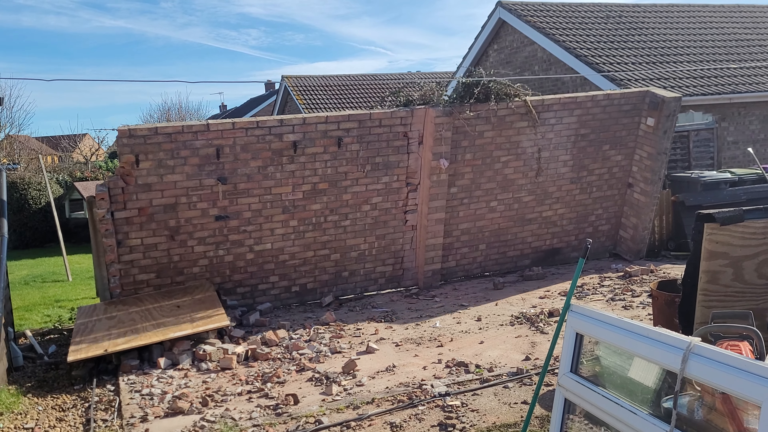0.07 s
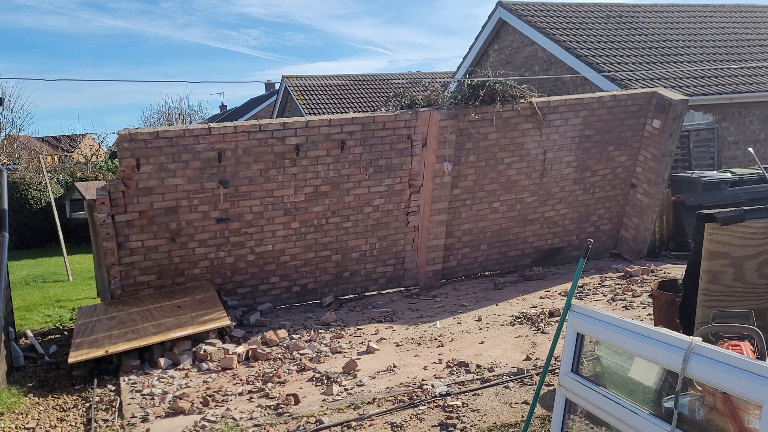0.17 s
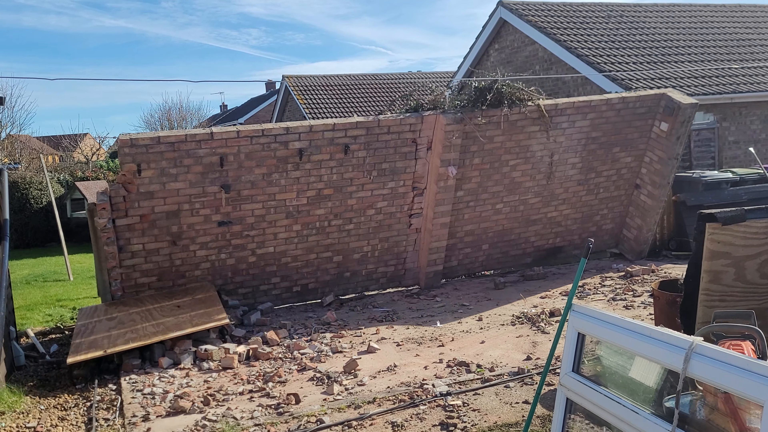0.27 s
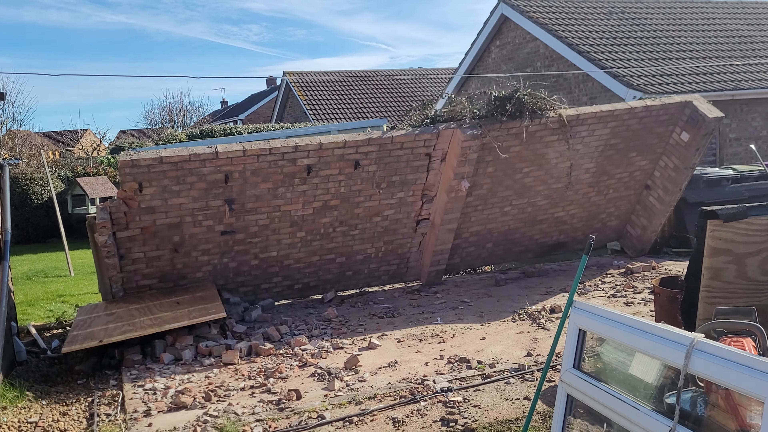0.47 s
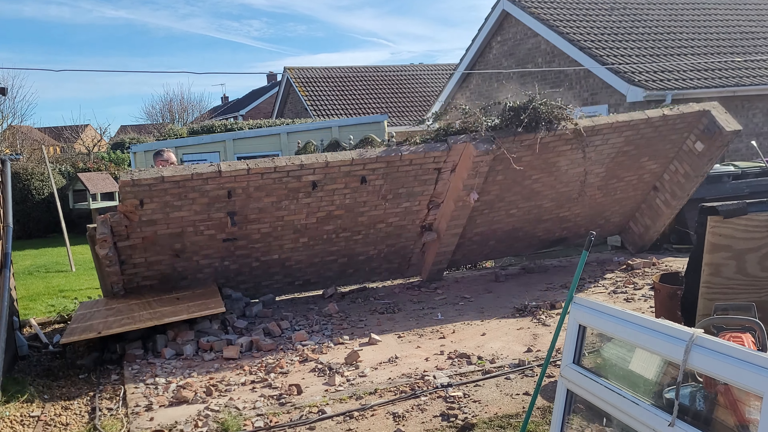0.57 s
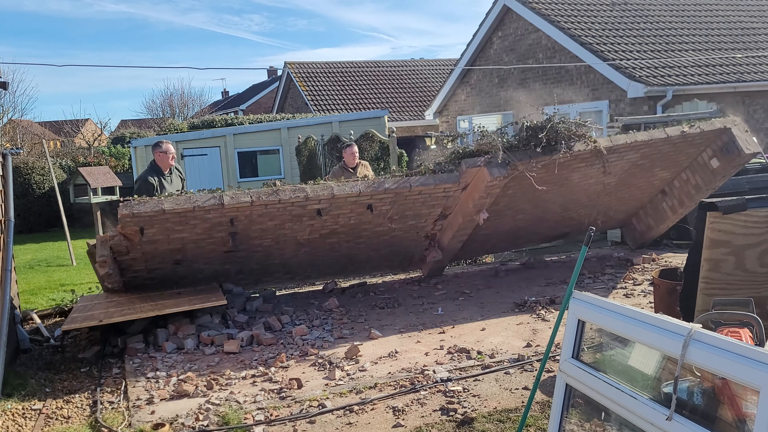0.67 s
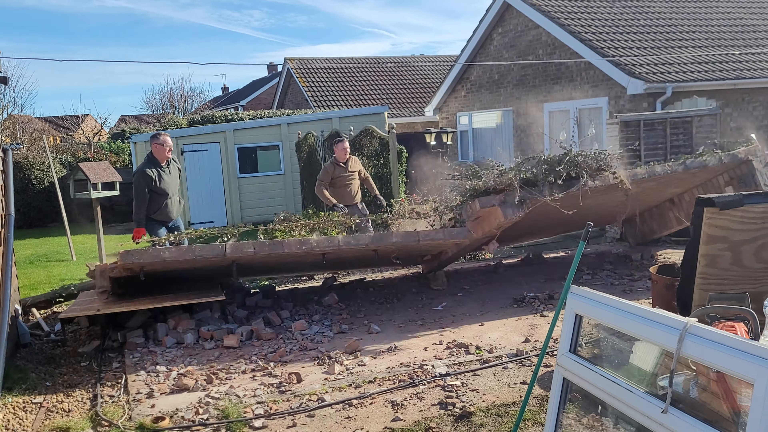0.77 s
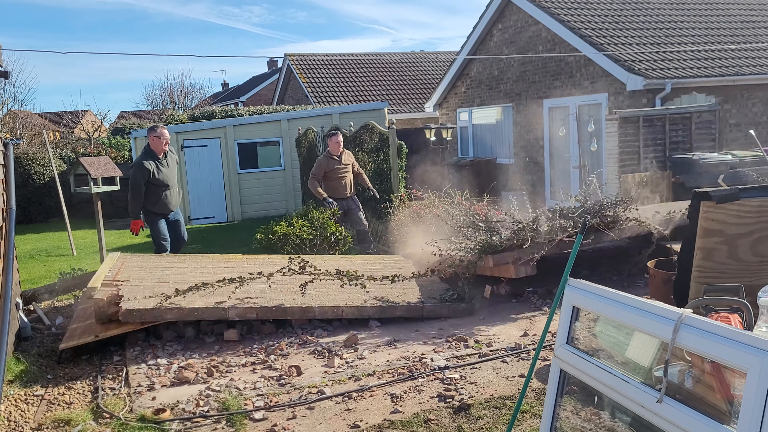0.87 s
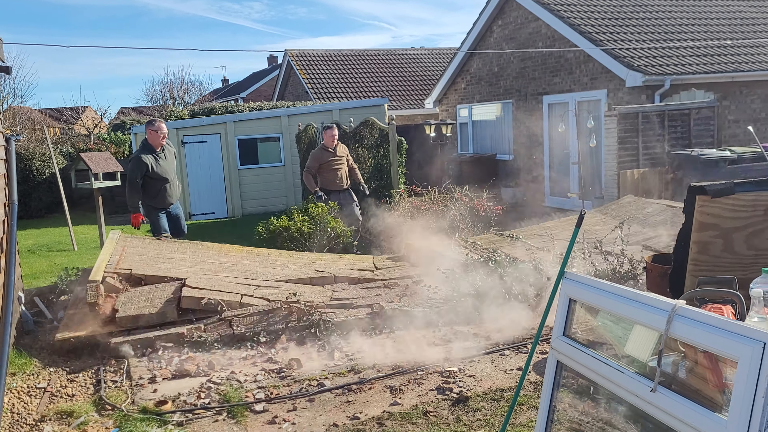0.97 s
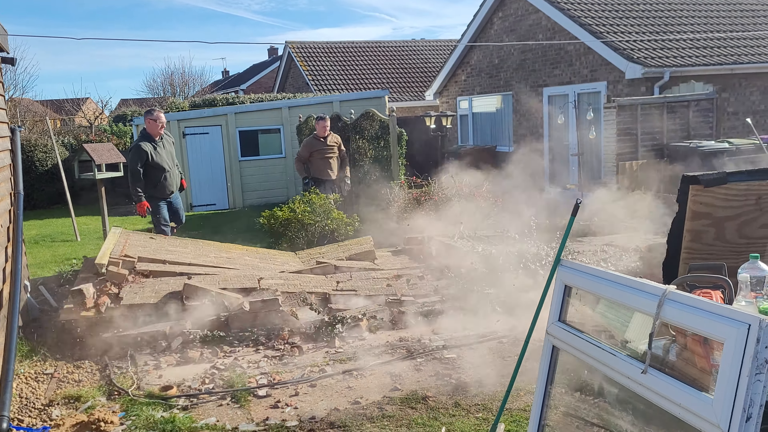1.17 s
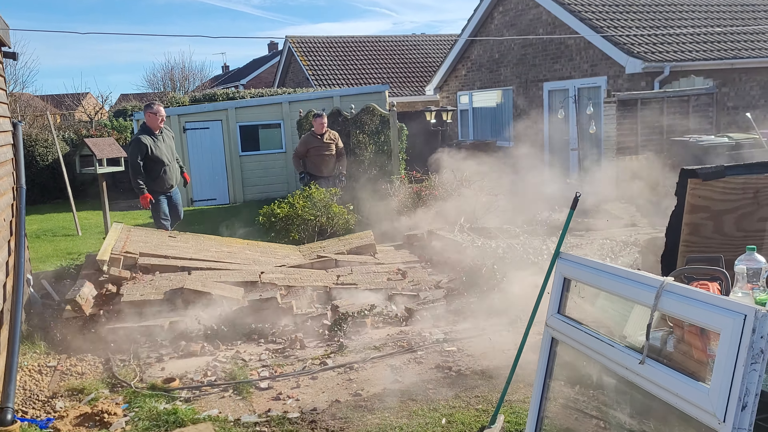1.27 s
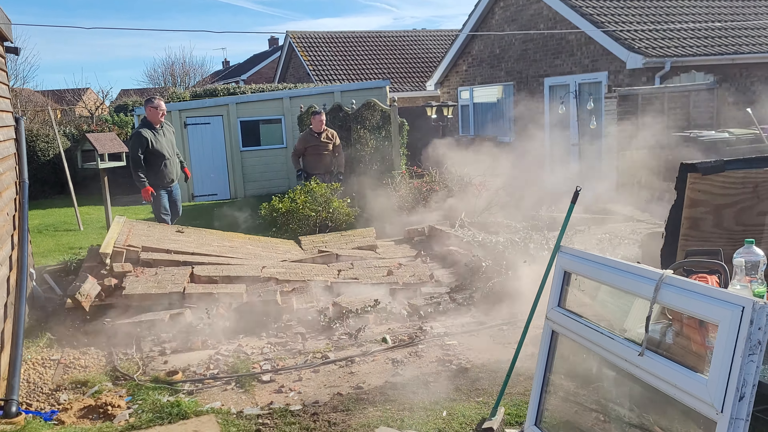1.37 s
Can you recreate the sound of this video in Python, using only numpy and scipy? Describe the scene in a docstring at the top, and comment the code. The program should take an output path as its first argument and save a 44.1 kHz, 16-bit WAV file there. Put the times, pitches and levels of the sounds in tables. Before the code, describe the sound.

Heard from a few metres off outdoors, a brick wall falls over. It knocks, cracks and grinds as it leans, then slams onto the paving with clacking bricks and heavy thuds, leaving a low rumble and trickling grit.

```python
"""Low shudders and dull knocks come first, as a brick wall starts to tip over in a garden a few metres away.
Its mortar cracks and grinds as it leans; then it slaps onto the paving in a burst of breaking brick.
The ground booms, slabs thud down one after another and the rubble settles.
Rubble is made of showers of tiny noise bursts; thuds, clacks and the boom are tones that die away."""
import sys
import numpy as np
from scipy import signal
from scipy.io import wavfile
from scipy.ndimage import uniform_filter1d

SR = 44100
rng = np.random.default_rng(int(sys.argv[2]) if len(sys.argv) > 2 else 0)


def generate_wav(sig):
    """Save sig (samples, or channels by samples) to the path in sys.argv[1] as 16-bit PCM at SR."""
    pcm = np.round(np.clip(np.atleast_2d(sig).T, -1, 1) * 32767).astype(np.int16)
    wavfile.write(sys.argv[1], SR, pcm)


N = 61739
TIME = np.arange(N) / SR

# The deep tone of heavy masonry. Each row: frequency in Hz, relative strength in dB.
MASONRY_SPECTRUM = [(30, -16), (60, 0.5), (130, 5.5), (245, 1), (310, -4.5), (520, -20), (900, -30)]


def tumbling_bricks():
    """Bricks pour onto the paving, loudest as the wall lands."""
    # Each row: time in seconds, level in dB.
    loudness = [(0, -44.5), (.55, -33), (.76, -38), (.85, -36.5), (.89, -17.5), (.94, -10), (.972, -10.5),
                (.995, -23.5), (1.08, -25.5), (1.16, -38.5), (1.4, -45.5)]
    # Each row: frequency in Hz, relative strength in dB.
    spectrum = [(250, -1), (400, -1), (600, -8.5), (920, -6.5), (1400, -20), (2300, -20.5), (4000, -79)]
    return level(loudness) * debris(spectrum, hits_per_s=600, spread_db=0.5, hiss_db=-5, steady_s=0.0132)


def slab_thuds():
    """Each slab lands with a low, quickly fading tone and a dull crunch."""
    # Each row: start in seconds, peak level in dB, pitch in Hz, fade time in seconds.
    landings = [(0.18, -18, 130.4, 0.024), (0.215, -19, 99, 0.065), (0.402, -21, 102.3, 0.042),
                (.461, -16.5, 265.5, 0.018), (0.55, -19.5, 89, 0.029), (0.607, -21, 130, 0.025),
                (0.72, -16.5, 233, 0.0093), (0.812, -9, 191.4, 0.0068), (.815, -19, 730, 0.0057),
                (0.94, -6.5, 250.5, 0.0063), (0.951, -16.5, 61.5, 0.039), (0.974, -6.5, 238, 0.013),
                (0.994, -4, 70, 0.024), (1.014, -10.5, 255, 0.0049), (1.082, -11.5, 249.4, 0.015),
                (1.192, -19.5, 382, 0.0047)]
    rise_s, crunch_db = 0.003, -8
    out = np.zeros((2, N))
    crunch = debris(MASONRY_SPECTRUM, hits_per_s=1800, spread_db=1.5, hiss_db=-8, steady_s=0.026)
    for start, db, hz, fade_s in landings:
        age = np.maximum(TIME - start, 0)
        shape = (1 - np.exp(-age / rise_s)) * np.exp(-age / fade_s)
        thud = np.sin(2 * np.pi * hz * age) + from_db(crunch_db) * crunch
        out += from_db(db) * shape / shape.max() * thud
    return out


def masonry_rumble():
    """Heavy pieces knock together in a muffled rumble with a hollow ring."""
    # Each row: time in seconds, level in dB.
    loudness = [(0, -35), (.11, -30.5), (.155, -48), (.2, -31), (.33, -36.5), (.46, -25.5), (.7, -25),
                (.79, -27), (.87, -19.5), (.97, -15), (1.03, -13), (1.11, -18), (1.17, -28), (1.29, -31.5),
                (1.4, -47)]
    knocking = debris(MASONRY_SPECTRUM, hits_per_s=200, spread_db=3.5, hiss_db=-4, steady_s=0.0189)
    return level(loudness) * muffle(from_db(-2.5) * knocking + hollow_ring(), hz=980)


def hollow_ring():
    """Knocks keep the masonry ringing at one pitch, which glides as the wall breaks."""
    # Each row: time in seconds, pitch in Hz, level within the rumble in dB.
    glide = [(.68, 248, -5.5), (.755, 297, 0.5), (0.826, 238.5, 3.5), (.93, 280, 2), (.99, 241, -2.5),
             (1.12, 281, -3.5), (1.21, 227, -0.5)]
    width_hz, steady_s = 22, 0.0317
    times, hz, db = np.transpose(glide)
    tone = np.exp(2j * np.pi * np.cumsum(np.interp(TIME, times, hz)) / SR)
    knocks = impacts(hits_per_s=400, spread_db=2)[0]
    # Keep only the part of the knocks that lies close to the gliding pitch.
    ring = signal.lfilter([1], [1, -np.exp(-np.pi * width_hz / SR)], knocks / tone)
    power = uniform_filter1d(np.abs(ring) ** 2, int(steady_s * SR) + 1)
    steady_ring = np.sqrt(2) * (ring * tone).real / np.sqrt(np.abs(power) + 1e-3)
    return from_db(np.interp(TIME, times, db)) * steady_ring


def cracks():
    """Brick and mortar break, each time in a short, dense run of snaps that stops dead."""
    # Each row: start in seconds, level in dB, length in seconds, treble boost in dB per octave.
    breaks = [(0.392, -35, 0.017, 1), (0.506, -23.5, 0.0078, -1.5), (0.547, -29.5, 0.013, -6),
              (0.782, -23, 0.011, -14.5), (.827, -16.5, 0.0053, -0.5), (0.838, -25.5, 0.0215, 1),
              (0.862, -19, 0.022, -3.5), (0.891, -17.5, 0.031, 1), (0.926, -23, 0.051, 1.5)]
    # Each row: frequency in Hz, relative strength in dB.
    spectrum = [(500, -18), (1000, 7.5), (2400, 7.5), (3500, 6), (5500, -5), (7600, -2), (9200, -15),
                (12000, -4.5), (15500, -14.5)]
    out = np.zeros((2, N))
    for start, db, length, tilt in breaks:
        tilted = [(hz, strength + tilt * np.log2(hz)) for hz, strength in spectrum]
        snaps = debris(tilted, hits_per_s=2100, spread_db=1, hiss_db=-0.5, steady_s=0.026)
        out += from_db(db) * burst(TIME - start, length, rise_s=0.00058, fade_s=0.0025) * snaps
    return out


def ground_boom():
    """The ground rings on under the full weight of the fallen wall."""
    start_s, pitch_hz, level_db, ring_s = 1.0, 69.2, -19.5, 0.85
    age = np.maximum(TIME - start_s, 0)
    return from_db(level_db - 60 * age / ring_s) * np.sin(2 * np.pi * pitch_hz * age)


def brick_clacks():
    """Single bricks knock together with a bright clack."""
    # Each row: start in seconds, level in dB, pitch multiplier for the tones below.
    hits = [(.393, -29.5, .435), (.828, -15.5, 1), (.899, -18.5, 1.32), (1.376, -44.5, 1.08)]
    # Each row: pitch in Hz, relative level in dB.
    tones = [(1750, -9.5), (2340, 1.5), (2900, -5), (3480, -1.5), (3850, -1)]
    return struck_stone(hits, tones)


def wall_shudder():
    """The whole wall shakes unevenly at its lowest pitch as it rocks on its foot."""
    # Each row: start in seconds, length in seconds, level in dB.
    shakes = [(0, 0.14, -33.5), (0.214, 0.24, -27)]
    pitch_hz, edge_s, waver = 58.2, 0.0082, 0.091
    out = np.zeros(N)
    drift = muffle(rng.standard_normal((2, 2 * N)), hz=28)[:, N:]
    swell, sway = waver * unit_power(drift)
    for start, length, db in shakes:
        age = TIME - start
        tone = np.sqrt(2) * (1 + swell) * np.sin(2 * np.pi * pitch_hz * age + sway)
        out += from_db(db) * burst(age, length, rise_s=edge_s, fade_s=edge_s) * tone
    return out


def grinding_mortar():
    """Mortar grinds in the opening joint, then grit trickles down."""
    # Each row: time in seconds, level in dB.
    loudness = [(0, -45.5), (.38, -40), (.56, -29.5), (.76, -31), (1.0, -31.5), (1.1, -41), (1.25, -43.5),
                (1.4, -50)]
    # Each row: frequency in Hz, relative strength in dB.
    spectrum = [(300, 11.5), (600, 2.5), (2500, -1), (4000, -5.5), (6000, -12), (7700, -8.5), (9300, -19.5),
                (12000, -8), (15500, -15)]
    return level(loudness) * debris(spectrum, hits_per_s=640, spread_db=3.5, hiss_db=2.5, steady_s=0.055)


def chip_ping():
    """A small chip is struck and gives a high ping."""
    # Each row: start in seconds, level in dB, pitch multiplier for the tones below.
    hits = [(.7765, -27.5, 1)]
    # Each row: pitch in Hz, relative level in dB.
    tones = [(3580, 1), (8560, -3.5), (11850, -2.5)]
    return struck_stone(hits, tones)


def rubbing_squeak():
    """Rubbing makes a soft squeak on the right only; its pitch rises a little and falls back."""
    start_s, length_s = 0.1817, 0.1
    pitch_hz, bend, level_db, octave_db = 440.5, 0.052, -29, -11.5
    progress = np.clip((TIME - start_s) / length_s, 0, 1)
    arch = np.sin(np.pi * progress).clip(0)
    phase = 2 * np.pi * np.cumsum(pitch_hz * (1 + bend * arch)) / SR
    tone = np.sin(phase) + from_db(octave_db) * np.sin(2 * phase)
    return from_db(level_db) * np.sqrt(arch) * tone * [[0], [1]]


def struck_stone(hits, tones):
    """Struck pieces ring briefly; their chattering contact roughens each tone, differently in each ear."""
    rise_s, ring_s, roughness = 0.001, 0.037, 0.35
    out = np.zeros((2, N))
    for start, db, pitch in hits:
        age = np.maximum(TIME - start, 0)
        rise = np.clip(age / rise_s, 0, 1)
        for hz, tone_db in tones:
            swell, sway = roughness * unit_power(muffle(rng.standard_normal((2, 2, N)), hz=220))
            tone = (1 + swell) * np.sin(2 * np.pi * hz * pitch * age + sway)
            out += from_db(db + tone_db - 60 * age / ring_s) * rise * tone
    return out


def debris(spectrum, hits_per_s, spread_db, hiss_db, steady_s):
    """A shower of small hits over a smooth hiss, shaped band by band and held at a steady loudness."""
    # Each row: frequency in Hz, how alike left and right are (1 is the same, 0 is unrelated).
    likeness = [(60, 0.82), (150, 1), (280, 1), (500, 0.43), (1000, -0.031)]
    hits = impacts(hits_per_s, spread_db)
    # Neighbouring bands take the hits with opposite signs.
    showers = [hits * sign + from_db(hiss_db) * rng.standard_normal((2, N)) for sign in (1, -1)]
    edges_hz = 25 * 2 ** (np.arange(29) / 3)  # three bands to an octave
    out = np.zeros((2, N))
    for k, (low, high) in enumerate(zip(edges_hz, edges_hz[1:])):
        hz = np.sqrt(low * high)
        if spectrum[0][0] < high and low < spectrum[-1][0]:
            band = signal.butter(2, [low, high], "band", fs=SR, output="sos")
            middle, side = signal.sosfilt(band, showers[k % 2])
            alike = np.clip(at_hz(likeness, hz), -.99, .99)
            stereo = np.sqrt(1 + alike) * middle + np.sqrt(1 - alike) * side * [[1], [-1]]
            out += from_db(at_hz(spectrum, hz)) * stereo
    out = unit_power(out)
    power = uniform_filter1d(np.mean(out ** 2, axis=0), int(steady_s * SR) + 1)
    return unit_power(out / np.sqrt(np.abs(power) + 0.0009))


def impacts(hits_per_s, spread_db):
    """Random hits of uneven size, each a tiny crumbling burst of noise."""
    crumble_s = 0.0015
    starts = rng.random(N) < hits_per_s / SR
    sizes = from_db(spread_db * np.minimum(rng.exponential(1, N), 3))
    power = signal.lfilter([1], [1, -np.exp(-1 / (crumble_s * SR))], starts * sizes ** 2 + 1e-18)
    return unit_power(np.sqrt(power) * rng.standard_normal((2, N)))


def burst(age, length, rise_s, fade_s):
    """A loudness shape that rises, holds and then fades."""
    return np.clip(age / rise_s, 0, 1) * np.exp(-np.maximum(age - length, 0) / fade_s)


def muffle(x, hz):
    """Take away the treble above hz."""
    return signal.sosfilt(signal.butter(2, hz, fs=SR, output="sos"), x)


def from_db(db):
    """Turn decibels into a multiplier."""
    return 10 ** (np.asarray(db) / 20)


def unit_power(x):
    """Scale a sound so that its average power is one."""
    return x / np.sqrt(np.mean(x ** 2) + 1e-20)


def level(rows):
    """Join rows of seconds and dB into a loudness curve."""
    return from_db(np.interp(TIME, *np.transpose(rows)))


def at_hz(rows, hz):
    """Read a table's value at one frequency."""
    frequencies, values = np.transpose(rows)
    return np.interp(np.log(hz), np.log(frequencies), values)


def scene():
    """Add up the fall; the heavy sounds and the cracks are a little louder on the right."""
    right_delay_s, pan_db = 0.00022, 1.0
    heavy = masonry_rumble() + tumbling_bricks()
    grit = grinding_mortar()
    heavy += slab_thuds() + wall_shudder() + ground_boom()
    heavy[1] = np.interp(TIME - right_delay_s, TIME, heavy[1])  # reaches the right side later
    wall = (heavy + cracks()) * from_db([[-pan_db], [pan_db]])
    return wall + grit + brick_clacks() + chip_ping() + rubbing_squeak()


def record(dry):
    """Take away the deepest bass, round off the loudest peaks and cut the highest treble."""
    low_cut_hz, high_cut_hz = 32, 16000
    thinned = signal.sosfilt(signal.butter(2, low_cut_hz, "high", fs=SR, output="sos"), dry)
    rounded = thinned / (1 + thinned ** 6) ** (1 / 6)
    return signal.sosfilt(signal.ellip(10, .2, 80, high_cut_hz, fs=SR, output="sos"), rounded)


dry = scene()
out = record(dry)
generate_wav(out)
```